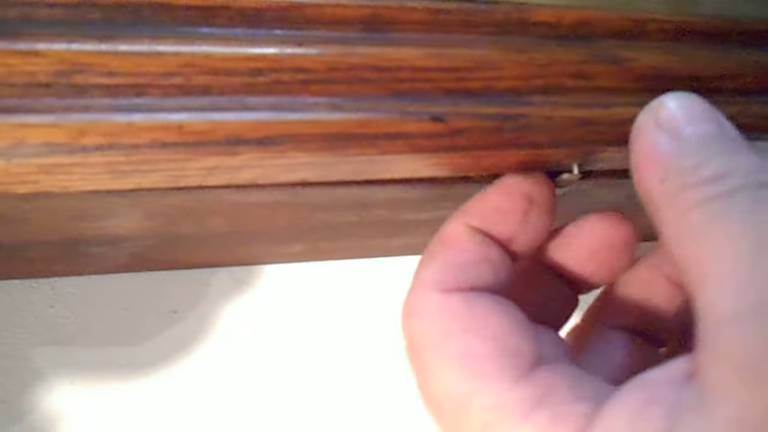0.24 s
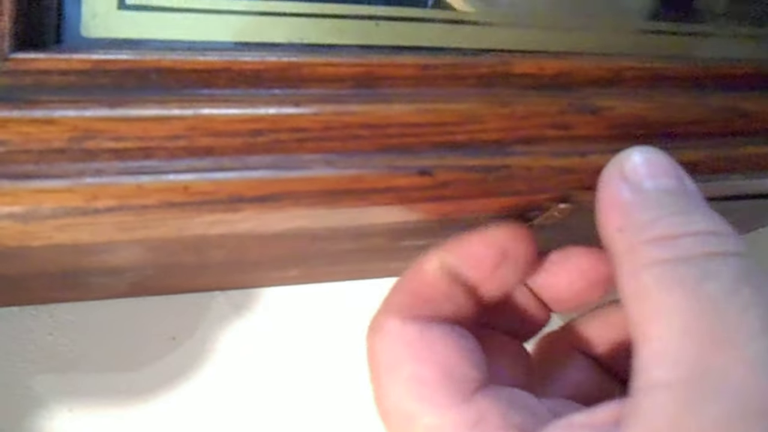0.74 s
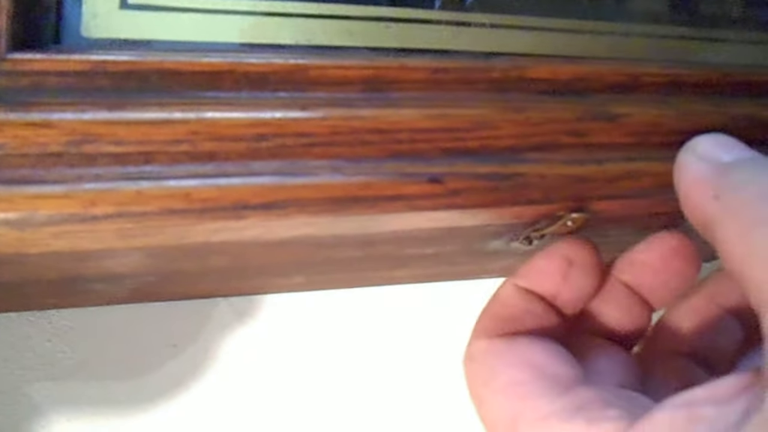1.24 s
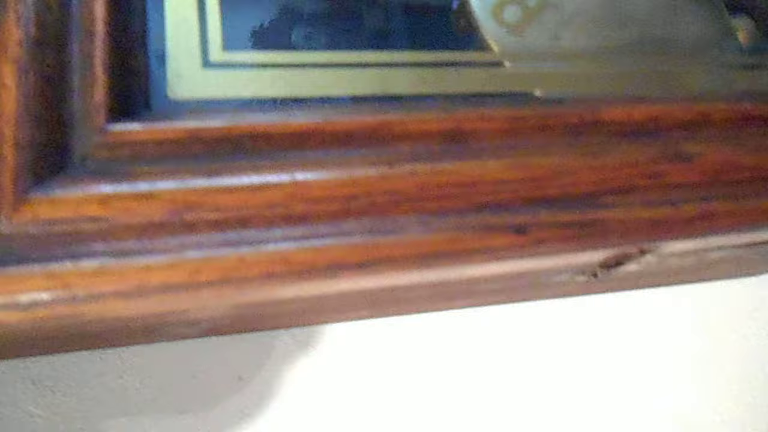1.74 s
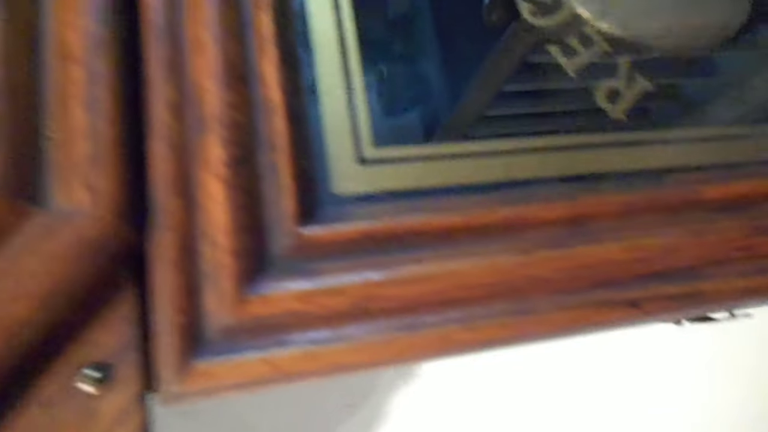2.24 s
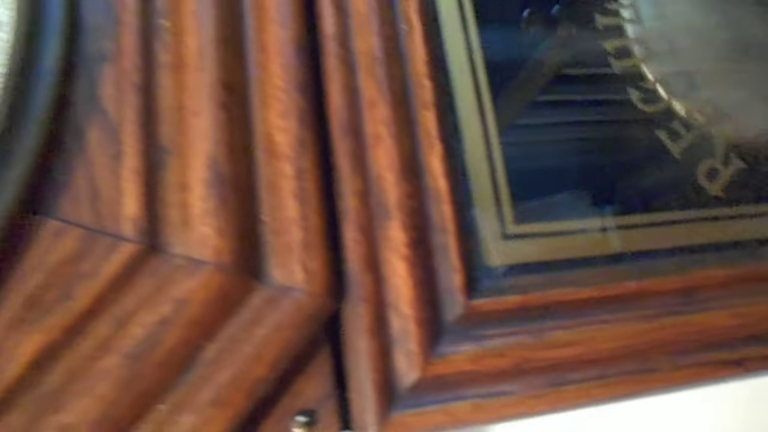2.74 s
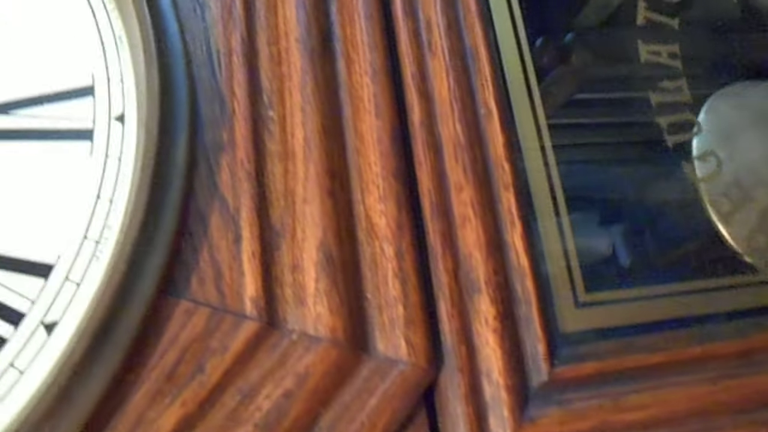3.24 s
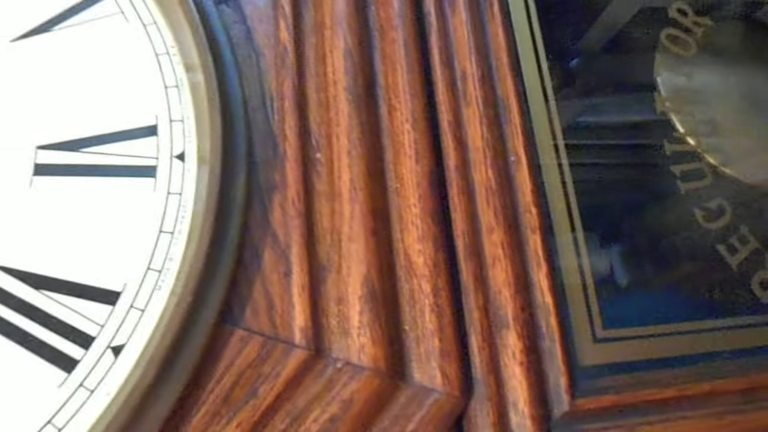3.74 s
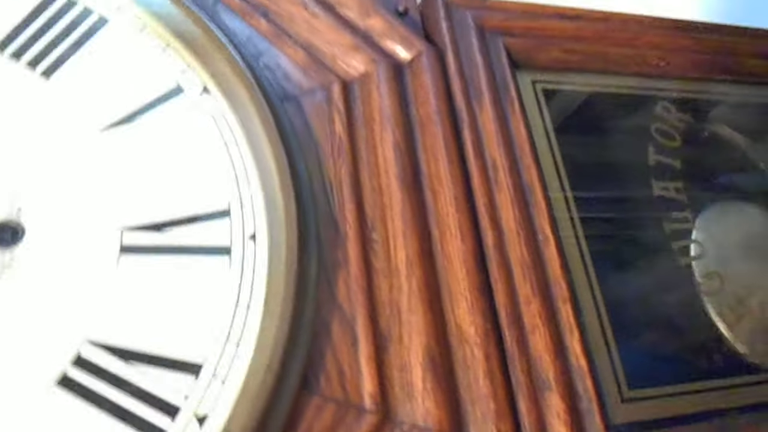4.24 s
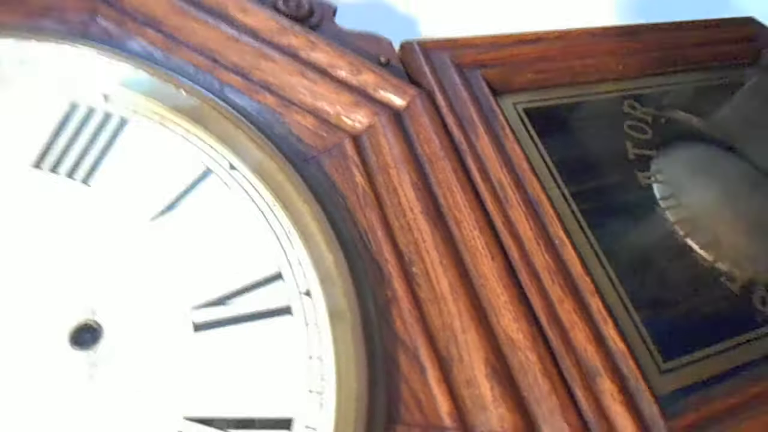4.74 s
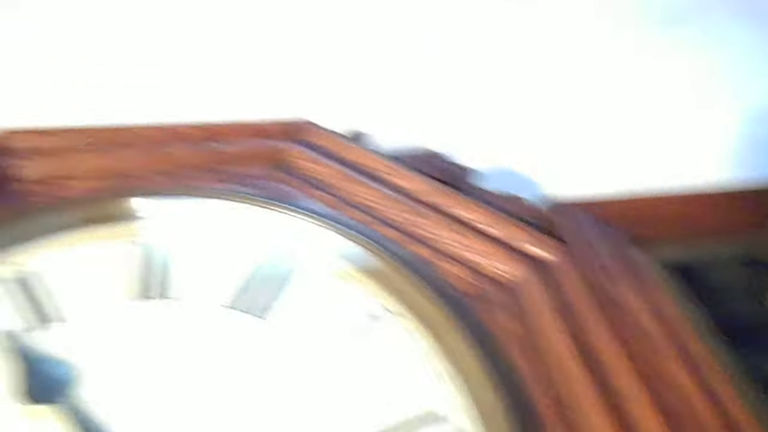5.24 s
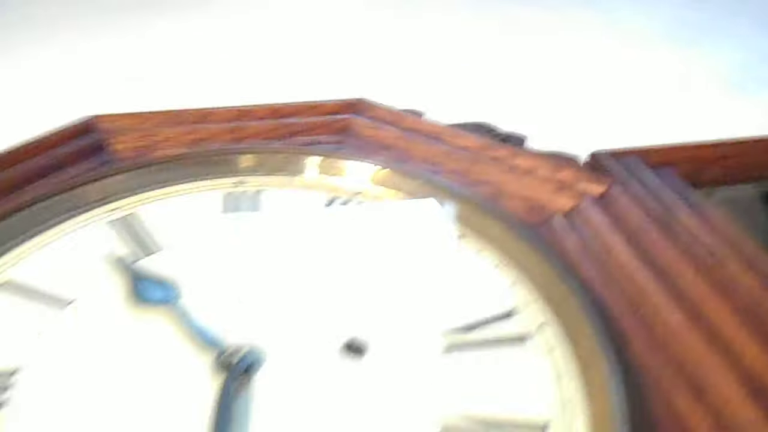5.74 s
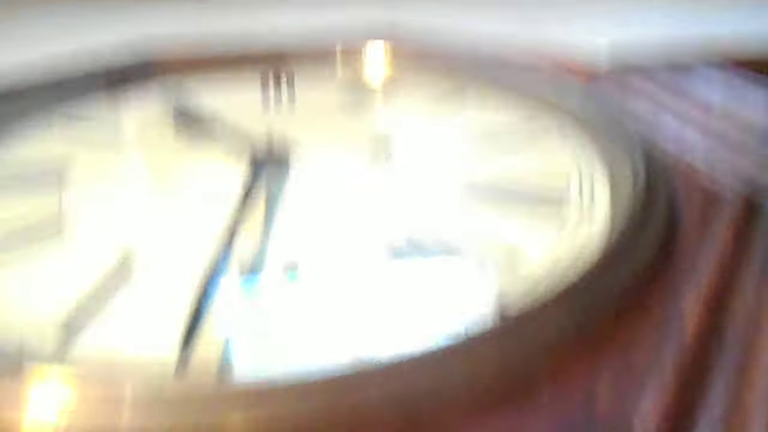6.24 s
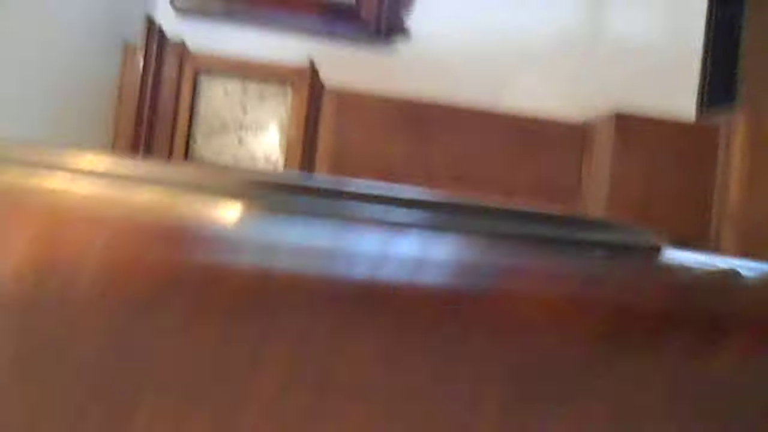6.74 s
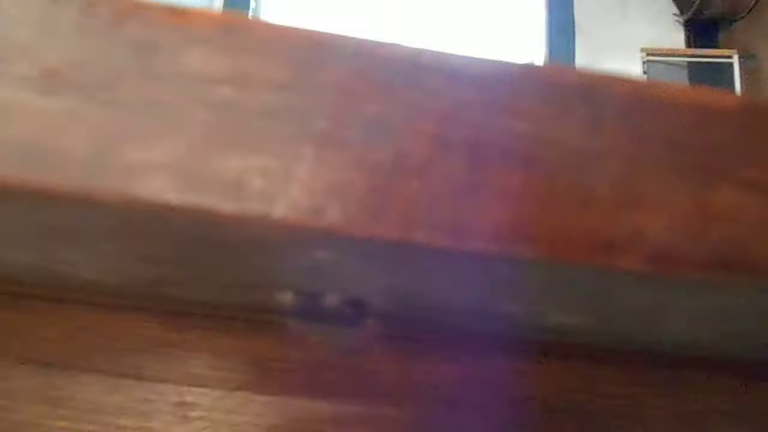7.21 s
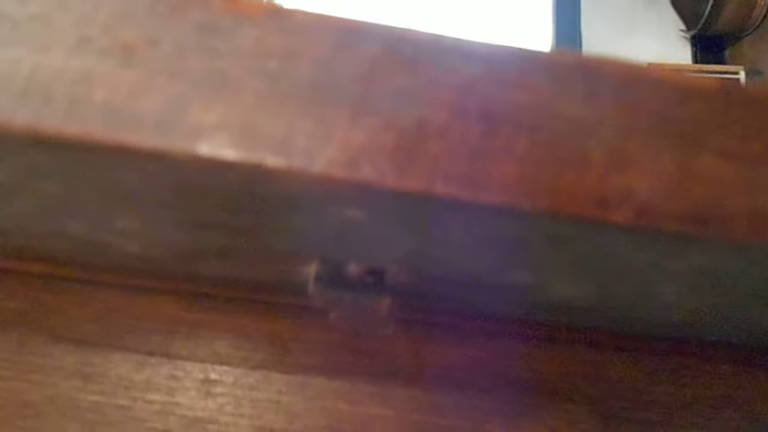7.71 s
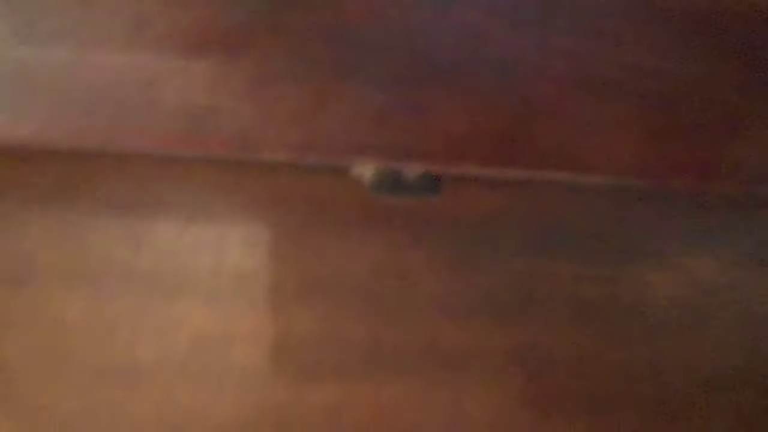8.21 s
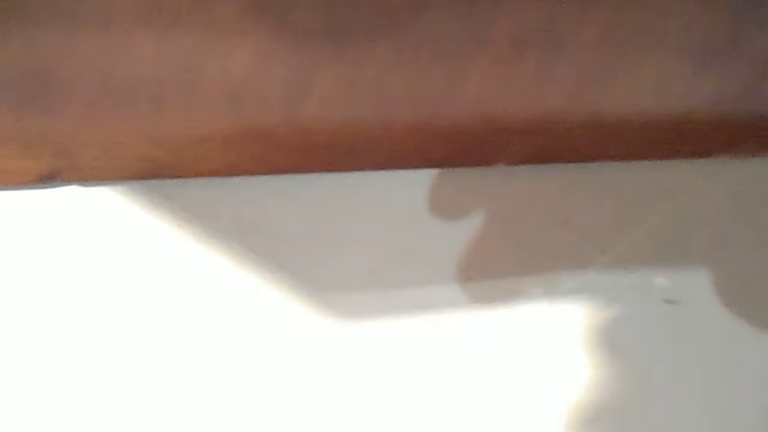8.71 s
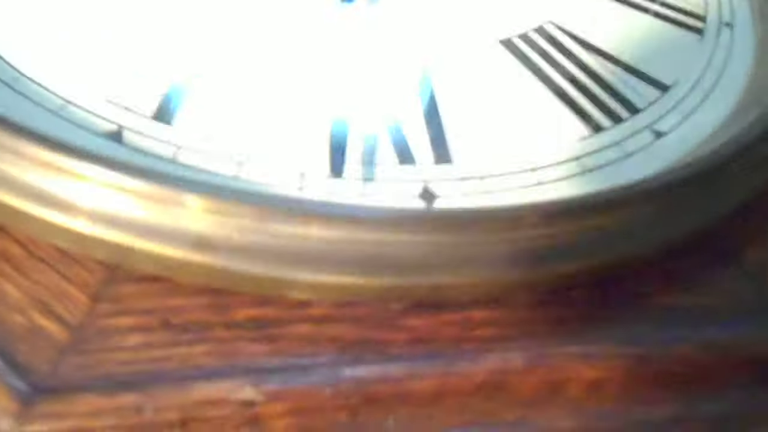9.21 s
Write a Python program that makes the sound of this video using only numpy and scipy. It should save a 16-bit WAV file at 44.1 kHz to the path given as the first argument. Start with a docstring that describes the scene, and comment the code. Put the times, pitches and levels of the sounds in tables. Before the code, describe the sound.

A few hollow wooden knocks and a loud snap of a metal latch sound as a wall clock's case is closed. The clock keeps up a steady, woody tick-tock with a light metallic edge, becoming louder in the later part. Two spells of thin, sharp clicks and hissy finger rubbing on the hand-held microphone interrupt, one halfway through and one near the end. The room is quiet, with a soft hum.

```python
"""Pendulum wall clock, close up

A clock ticks in a quiet room, heard on the microphone of a small hand-held camera moving round its case.
Each beat of the escapement rings the wooden backboard and the steel pallets. A hand knocks the case and
snaps its door hook shut; right at the microphone, fingers rub, bump and click on the camera housing.
The room hums softly and answers every beat and knock; the loudest knock clips."""
import sys
import numpy as np
from scipy import signal
from scipy.fft import rfft, irfft, next_fast_len
from scipy.io import wavfile
from scipy.ndimage import uniform_filter1d, map_coordinates

SR = 44100
rng = np.random.default_rng(int(sys.argv[2]) if len(sys.argv) > 2 else 0)


def output_pcm(signal):
    """Save a mono or channel-first signal as 16-bit PCM at the path in sys.argv[1].

    Samples are clipped to [-1, 1] before scaling.
    """
    pcm = np.clip(np.atleast_2d(signal).T, -1, 1) * 32767
    wavfile.write(sys.argv[1], SR, np.round(pcm).astype(np.int16))


N = 417624


def escapement():
    """Beats fall on the two pallets in turn; each drives the backboard and rings the steel."""
    # tock and tick in turn, louder as the microphone nears: start_s, level_db, steel_db, low_case_db
    beats = [(0.324, -32.5, -10, -0.5), (0.957, -34, -2.5, -5.5), (1.622, -34, -11, -3),
             (2.254, -34, 1.5, -3.5), (2.916, -37.5, -12, -2), (3.557, -36.5, 0.3, -1.5),
             (4.222, -37, -24, -1.6), (4.854, -37.5, 1.1, -2), (5.521, -39.5, -13, 0),
             (6.154, -31.5, -7.5, -4.5), (6.807, -24.5, -19.5, -2.5), (7.458, -24, -11.5, -2),
             (8.118, -24, -19, -2), (8.757, -27, 2.5, -7), (9.417, -31, -18, -7.5)]
    # modes of the movement and backboard: pitch_hz, tock_db, tick_db, t60_s
    case_modes = [(480, -18.5, 2.5, .05), (684, -9.5, 2.8, .07), (795, -2.5, -6.5, .07),
                  (905, -2, 2.5, 0.085), (1040, -8, 0, 0.066), (1200, -9, 3, 0.11), (1495, -13, 3.5, 0.041),
                  (1630, -15.5, -10.5, .05), (2080, 3, 1, 0.06), (2149, -8, -15.5, 0.059),
                  (2365, 1.5, -2.5, 0.039), (2560, -9, -13, .05), (2790, -5, -3, 0.05),
                  (3040, -7.5, 0, 0.066), (3526, -4.5, -5.3, 0.012), (4320, -23.5, -3, 0.00975)]
    # modes of the steel pallets: pitch_hz, level_db, t60_s
    steel_modes = [(5327, -9, 0.028), (4956, -8, 0.1), (6536, -5.5, .04), (6748, 0, 0.044),
                   (6800, -0.5, 0.066), (7156, -8.5, 0.037), (8200, -10, 0.023), (8950, -2.5, 0.043)]
    tock_ms, tick_ms = 6, 12  # contact on either pallet
    room_db = -37  # the room answers at one level, near or far
    out = np.zeros(N)
    for k, (start_s, level_db, steel_db, low_case_db) in enumerate(beats):
        is_tick = k % 2
        modes = [(hz, tick_db if is_tick else tock_db, t60) for hz, tock_db, tick_db, t60 in case_modes]
        contact_ms = tick_ms if is_tick else tock_ms
        low = ring(modes[:8], contact_ms, dense_db=-6, dense_t60_s=0.045)
        high = ring(modes[8:], contact_ms, dense_db=-5.5, dense_t60_s=0.022)
        steel = ring(steel_modes, contact_ms, dense_db=-5, dense_t60_s=0.034)
        beat = amp(low_case_db) * low + high + amp(steel_db) * steel
        add(out, start_s, amp(level_db) * in_room(beat, room_db - level_db))
    return out


def knocks():
    """Each knock shakes the door, booms in the hollow case and rattles the hook."""
    # blows on the case; sustain is the share of ring time that a damping hand leaves:
    # start_s, level_db, boom_db, hook_db, rattle_ms, hardness_db_per_octave, room_db, sustain
    blows = [(0.001, -18.5, -12.5, -5, 16, 0.5, -5.5, 1), (0.474, -38, 6.5, -13, 7.4, 9, 2, 0.5),
             (0.484, -27.5, -30, 3, 48, 1.5, -26, 0.61), (0.543, 3.5, -11, -4.5, 14.8, 1, -11, 0.73),
             (0.552, -5.5, -13.5, 13.5, 1.5, -5, -15.5, 1), (0.876, -33, 1.5, -18, 10, -10, 2.5, 0.94),
             (0.883, -37.5, 8, -24.5, 4, -7, -12.5, .9), (1.012, -19, -0.6, -6.5, 14.4, -3.5, -6.5, 0.73),
             (1.493, -34, -14, 11.5, 1.7, 5, -10.5, 0.79), (1.529, -45, -8, -12.5, 7.7, 0.6, -0.5, 0.71),
             (6.036, -38, -17.5, -3, 17.6, 1.3, 4, 0.3), (6.081, -48.5, 5, 2, 15, -9, 2.5, 0.69),
             (6.292, -37, -8, -7, 23, -2.5, -12, .3), (6.329, -20.5, -29, -12, 6.1, -4, -19, 0.085),
             (7.699, -34, -21, -10.5, 9.9, -0.3, 0, 0.34)]
    # modes of the door, the hollow case and the brass hook: pitch_hz, level_db, t60_s
    door_modes = [(643.4, -2.5, .08), (790, -6.5, 0.21), (825, -4.5, 0.24), (996, -1.5, 0.038),
                  (1350, -8.5, 0.035), (1550, -5.5, 0.03), (2194, -9, .06), (2470, 2.5, 0.029),
                  (2920, -4.5, .06)]
    boom_modes = [(214, 3, 0.13), (273, 5.5, 0.24), (337.5, 1, 0.27), (447, -2, 0.089), (568, -5, 0.089)]
    hook_modes = [(4230, -4.5, 0.057), (4972, 1, 0.027), (5140, 0.7, 0.03), (5370, -1.7, 0.064),
                  (5810, -1, 0.032), (7020, -6, 0.076), (8100, -12, 0.027), (8900, -25.5, .03)]
    out = np.zeros(N)
    for start_s, level_db, boom_db, hook_db, rattle_ms, hardness, room_db, sustain in blows:
        door = ring(door_modes, rattle_ms, dense_db=3.5, dense_t60_s=0.027,
                    tilt_db_per_octave=hardness, sustain=sustain)
        # the heavy case feels only the first contacts
        boom = ring(boom_modes, rattle_ms / 2, dense_db=-1, dense_t60_s=0.1 * sustain, sustain=sustain)
        hook = ring(hook_modes, rattle_ms, dense_db=0.5, dense_t60_s=0.03, sustain=sustain)
        knock = door + amp(boom_db) * boom + amp(hook_db) * hook
        add(out, start_s, amp(level_db) * in_room(knock, room_db))
    return out


def housing_clicks():
    """Something snaps free on the housing: a few treble cycles, a duller knock and a faint rattle."""
    # snaps right at the microphone: start_s, level_db, pitch_hz
    snaps = [(4.5745, -27, 5770), (4.7451, -23, 5450), (4.9338, 1, 7760), (4.991, -7.5, 5700),
             (5.024, -31, 5150), (5.2914, -11, 6400), (5.3972, -27, 5320), (5.5338, -36, 5760),
             (5.7306, -36, 6410), (5.7945, -42, 5920), (6.3333, -19.5, 5500), (6.43, -34, 6460),
             (6.548, -39, 5900), (6.958, -41.5, 6940), (8.6312, -25, 6430), (8.748, -17, 7000),
             (8.764, -8, 6760), (8.772, -33, 5800), (8.8182, -11.5, 6340), (8.884, -26.5, 6190),
             (8.889, -9.5, 5500), (8.9072, -20.5, 5500), (9.017, -40.5, 5960), (9.0424, -23.5, 6020),
             (9.053, -42, 6500), (9.0774, -38, 6080), (9.1312, -31, 5250), (9.203, -32.5, 4400),
             (9.216, -36, 5500), (9.2912, -27, 4660)]
    # housing modes under a snap: pitch_hz, level_db
    housing_modes = [(2070, -20.5), (2600, -1.5), (3450, 3)]
    rise_cycles, t60_s = 0.98, 0.011
    out, t = np.zeros(N), np.arange(SR // 50) / SR
    fade_db = -60 * t / t60_s
    for start_s, level_db, pitch_hz in snaps:
        rise_s = rise_cycles / pitch_hz
        snap = np.sin(2 * np.pi * pitch_hz * t) * (t / rise_s) * np.exp(1 - t / rise_s)
        modes = sum(amp(db + 6.3 * rng.standard_normal()) * np.sin(2 * np.pi * hz * t)
                    for hz, db in housing_modes)
        knock = amp(-30 + 0.64 * level_db + fade_db) * modes  # grows more slowly than the snap
        rattle = amp(-12 + fade_db) * np.diff(rng.standard_normal(len(t) + 1))
        add(out, start_s, amp(level_db) * (snap + rattle) + knock)
    return out


def finger_strokes():
    """Skin slides in tiny uneven slips that excite the housing; harder slides slip more coarsely."""
    # slides on the housing: peak_s, rise_ms, fall_ms, level_db, bright_db, scrape_db
    strokes = [(0.115, 30, 30, -55.5, -4, -4), (0.26, 30, 30, -61, 5, -9), (4.37, 60, 71, -63.5, 2, -12.5),
               (4.475, 21, 29, -57, 1.5, -15), (4.583, 9, 46, -37.5, -5, -16),
               (4.624, 36, 63, -33.5, -2, -19.5), (4.7, 46, 40, -45.5, -1.1, -21),
               (4.748, 29, 19, -36.5, 0, -18), (4.79, 33, 47, -53, -4, -6), (4.855, 45, 44, -40.5, 3, -14),
               (4.96, 130, 180, -47.5, 1, -19), (5.15, 47, 53, -32.5, -2, -11),
               (5.215, 30, 85, -32.5, -5, -6.5), (5.26, 35, 13, -17.5, 9.5, -23.5),
               (5.305, 71, 16, -38, -4, -19), (5.37, 36, 49, -51.5, -0.6, -9),
               (5.44, 85, 46, -46.5, -1.5, -11), (5.64, 45, 64, -59, -4.5, -2),
               (6.2, 27, 55, -59.5, -2.1, -9), (6.35, 29, 68, -46.5, 0, -12), (6.44, 49, 47, -51, -1.5, -9),
               (6.605, 18, 34, -48.5, 1, -10), (6.75, 290, 350, -62.5, 0, -5.5),
               (8.395, 25, 25, -58, -2, -12), (8.64, 13.5, 9.2, -46, 0, -6), (8.668, 21, 72, -40, 0, -8.5),
               (8.775, 56, 42, -44, 2, -7), (8.895, 40, 27, -31, 1, -19.5),
               (9.05, 65, 50, -52.5, -3, -12.5), (9.14, 42, 31, -52.5, -1, -6.5),
               (9.25, 130, 110, -62, -7, -16), (9.33, 60, 58, -59.5, -1, -7)]
    # spectra of the housing's lower hiss, its upper hiss and the scrape: frequency_hz, density_db
    lower_hiss = [(3000, -35), (3800, -9.5), (4600, -7.5), (5400, -4), (5750, 1), (6100, -6.5),
                  (7000, -20.5), (11000, -21)]
    upper_hiss = [(5000, -96.5), (6300, -6.5), (7100, -0.5), (8300, -5), (9300, -10.5), (10500, -15),
                  (13000, -24.5)]
    scrape = [(400, -32), (800, -13.5), (1200, -12.5), (1700, -13.5), (2100, -3.5), (2550, 0), (3000, -1.5),
              (3600, -11.5), (4200, -28.5)]
    edge_db, flatness = 16.5, 1.74  # drop at one rise or fall time from the peak; its exponent
    t = np.arange(N) / SR
    power = np.full((3, N), 1e-12)  # one row for each spectrum
    for peak_s, rise_ms, fall_ms, level_db, bright_db, scrape_db in strokes:
        from_peak = 1000 * np.where(t < peak_s, (peak_s - t) / rise_ms, (t - peak_s) / fall_ms)
        bright = amp(2 * bright_db)  # power of the upper hiss over the lower
        shares = np.array([1 / (1 + bright), bright / (1 + bright), amp(2 * scrape_db)])
        near = from_peak < 4
        envelope_db = level_db - edge_db * from_peak[near] ** flatness
        power[:, near] += shares[:, None] * amp(2 * envelope_db)
    hiss_db = 10 * np.log10(power[0] + power[1])
    coarseness = np.clip((hiss_db + 42) / 25, 0.2, 1.3)
    slips = rng.standard_normal(N) * amp(coarseness * (3.4 * wobble(450) + 1.1 * wobble(90)))
    layers = [unit(coloured(slips, spectrum)) for spectrum in (lower_hiss, upper_hiss, scrape)]
    return np.sum(np.sqrt(power) * layers, axis=0)


def hand_bumps():
    """The hand meets the housing softly: a dull band of noise that swells in a few ms and dies."""
    # soft contacts: start_s, level_db, pitch_hz
    bumps = [(1.491, -48.5, 91), (4.088, -57, 141), (4.749, -65, 83.4), (5.552, -52.5, 121),
             (5.714, -51.5, 139), (5.828, -59, 111), (6.084, -49, 149), (6.199, -55, 165),
             (8.893, -60, 150)]
    rise_s, t60_s = 0.0078, 0.31
    out, t = np.zeros(N), np.arange(SR // 3) / SR
    for start_s, level_db, pitch_hz in bumps:
        band = lambda hz: np.exp(-0.5 * (np.log((hz + 1) / pitch_hz) / 0.47) ** 2)
        thud = unit(filtered(rng.standard_normal(len(t)), band))
        envelope = amp(level_db - 60 * t / t60_s) * (1 - np.exp(-t / rise_s))
        add(out, start_s, envelope * thud)
    return out


def room_tone_and_rumble():
    """Room tone with a few soft resonances, and the rumble of the holding hand; both waver slightly."""
    # course of the background: time_s, rumble_db, tone_db
    levels = [(0.0, -59, -56), (0.3, -64.5, -58.5), (1.79, -64.5, -61), (2.11, -61.5, -58.5),
              (3.2, -67.5, -60), (4.2, -65.5, -58.5), (4.7, -66.5, -57.5), (5.2, -67.5, -57.5),
              (5.781, -58, -56.5), (6.139, -67, -57), (6.4, -63, -56.5), (6.7, -63, -55.5),
              (7.2, -66.5, -59.5), (8.5, -68.5, -59), (8.851, -63.5, -59.5), (9.47, -65.5, -55.5)]
    # spectra of the room tone and the hand rumble: frequency_hz, density_db
    tone_spectrum = [(41, -36.5), (70, -3.5), (117, -10.5), (303, -9), (352, -11), (409, -5), (486, -10),
                     (565, -8.5), (850, -10), (1170, -7.5), (2100, -7.5), (3370, -12.5), (7800, -11.5),
                     (10100, -13), (12000, -33), (15600, -62.5), (22000, -120)]
    rumble_spectrum = [(12, -4.5), (28, 3.5), (45, -13.5), (80, -28.5), (150, -56.5)]
    # resonances in the room tone: centre_hz, half_width_hz, boost_db
    resonances = [(566.3, 13, 5.5), (1300, 150, 3.5), (2150, 80, 3.5), (3130, 600, 5.5)]
    time_s, rumble_db, tone_db = np.transpose(levels)
    t = np.arange(N) / SR
    boost_db = lambda hz: sum(db / (1 + ((hz - centre) / width) ** 2) for centre, width, db in resonances)
    tone = unit(filtered(rng.standard_normal(N), lambda hz: amp(along(tone_spectrum, hz) + boost_db(hz))))
    rumble = unit(coloured(rng.standard_normal(N), rumble_spectrum))
    tone_gain = amp(np.interp(t, time_s, tone_db) + 0.61 * wobble(10))
    rumble_gain = amp(np.interp(t, time_s, rumble_db) + 1.4 * wobble(10))
    return tone_gain * tone + rumble_gain * rumble


def ring(modes, contact_ms, dense_db, dense_t60_s, tilt_db_per_octave=0, sustain=1):
    """A body struck once and rattled on: clear modes over a noisy thicket of dense ones; peak 1."""
    t = np.arange(SR // 4) / SR
    contact_s = contact_ms / 1000
    hz, db, t60_s = np.transpose(modes)[:, :, None]
    scatter_db = 2 * rng.standard_normal(hz.shape)
    sign = (-1) ** np.arange(len(hz))[:, None]  # neighbours start in opposite phase
    envelopes = amp(db + scatter_db - 60 * t / (sustain * t60_s))
    clear = np.sum(sign * envelopes * np.sin(2 * np.pi * hz * t), axis=0)
    rattle = rng.standard_normal(len(t)) * np.exp(-t / contact_s) / np.sqrt(contact_s * SR)
    rattle[0] = 1.5  # the first blow is the strongest contact
    clear = signal.fftconvolve(clear, rattle)[:len(t)]
    low_hz, high_hz = hz.min() * 0.85, hz.max() * 1.1
    band = signal.butter(3, [low_hz, high_hz], "bandpass", fs=SR, output="sos")
    fade = np.exp(-t / (contact_s + dense_t60_s / np.log(1000)))
    thicket = signal.sosfilt(band, rng.standard_normal(len(t)) * fade)
    # harder blows reach higher modes
    tilt = lambda f: amp(tilt_db_per_octave * np.log2(np.clip(f, low_hz, high_hz) / low_hz))
    out = filtered(unit(clear) + amp(dense_db) * unit(thicket), tilt)
    return out / np.abs(out).max()


def in_room(sound, room_db):
    """The sound and a diffuse tail of the same broad colour, each frequency dying at its own speed."""
    # reverberation of the room: frequency_hz, t60_s
    decay_times = [(200, 0.41), (1000, .35), (4000, 0.23), (10000, 0.062)]
    hz, t, noise = signal.stft(rng.standard_normal(SR // 2), SR, nperseg=512)
    power = uniform_filter1d(np.abs(rfft(sound, 2 ** 14)) ** 2, size=24)[::32]
    envelope = np.clip(t / 0.0074, 0, 1) * amp(-60 * t / along(decay_times, hz)[:, None])
    tail = signal.istft(noise * envelope * np.sqrt(np.abs(power))[:, None], SR, nperseg=512)[1]
    out = amp(room_db) * tail / np.linalg.norm(tail) * np.linalg.norm(sound)
    add(out, 0, sound)
    return out


def amp(db):
    """Gain of a level in dB."""
    return 10 ** (np.asarray(db) / 20)


def unit(x):
    """x at rms 1."""
    return x / np.sqrt(np.mean(x ** 2) + 1e-20)


def along(points, hz):
    """The value at hz between (frequency_hz, value) points, on a log axis."""
    point_hz, values = np.transpose(points)
    return np.interp(np.log(hz + 1), np.log(point_hz + 1), values)


def wobble(rate_hz):
    """A smooth random curve with rate_hz knots a second."""
    knots = rng.standard_normal(int(N * rate_hz / SR) + 4)
    return map_coordinates(knots, [np.arange(N) * rate_hz / SR])


def filtered(x, response):
    """x through a filter whose gain is response(hz)."""
    size = next_fast_len(x.shape[-1] + 8192)
    return irfft(rfft(x, size) * response(np.fft.rfftfreq(size, 1 / SR)), size)[..., :x.shape[-1]]


def coloured(x, curve):
    """x through a curve of (frequency_hz, gain_db) points."""
    return filtered(x, lambda hz: amp(along(curve, hz)))


def add(track, start_s, sound):
    """Mix a sound into the track at start_s."""
    part = track[max(round(start_s * SR), 0):][:len(sound)]
    part += sound[:len(part)]


def scene():
    """Clock, handling noise and room at the single microphone."""
    clock = escapement() + knocks()
    handling = hand_bumps() + housing_clicks() + finger_strokes()
    return (clock + handling + room_tone_and_rumble())[None]


def record(dry):
    """The microphone rolls off the treble; the input stage clips and hisses, up to a band limit."""
    # response of the microphone, and colour after the input stage: frequency_hz, gain_db
    microphone = [(20, 2.5), (9000, -0.5), (10400, -4), (11000, -12.5), (12200, -23.5), (12800, -46),
                  (16000, -62)]
    output_colour = [(25, -1), (170, -0.5), (11000, -0.5), (12500, -20), (16000, -21)]
    # hiss of the electronics, heard above the microphone's range: frequency_hz, density_db
    hiss_spectrum = [(9500, -19.5), (10800, -4), (12300, -3.5), (12600, -47)]
    clip_level, band_limit_hz = 0.66, 16800
    sensed = coloured(dry, microphone)
    clipped = sensed / (1 + np.abs(sensed / clip_level) ** 8) ** (1 / 8)
    hiss = amp(-85) * unit(coloured(rng.standard_normal(N), hiss_spectrum))
    return filtered(clipped + hiss, lambda hz: amp(along(output_colour, hz)) * (hz < band_limit_hz))


dry = scene()
out = record(dry)
output_pcm(out)
```